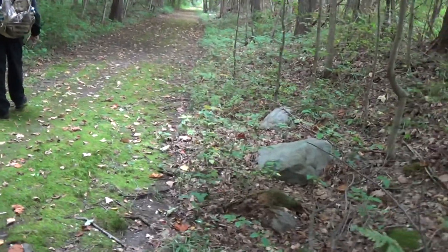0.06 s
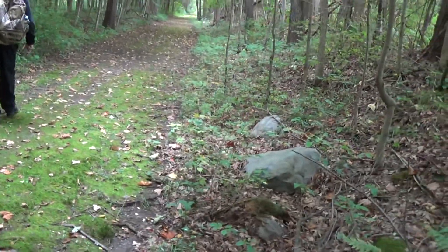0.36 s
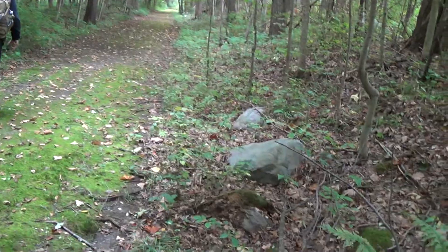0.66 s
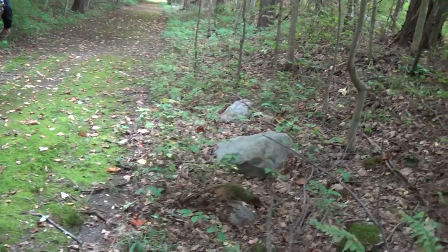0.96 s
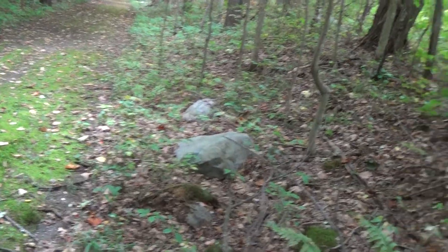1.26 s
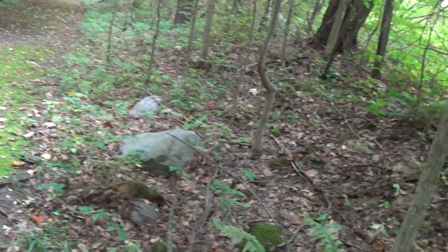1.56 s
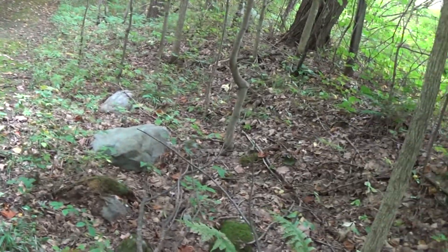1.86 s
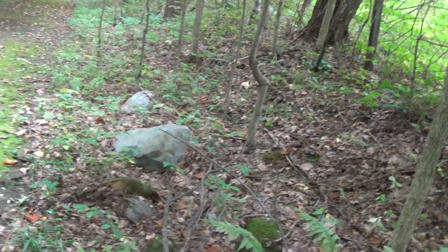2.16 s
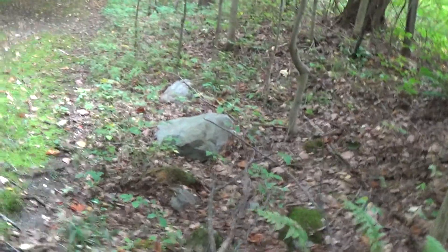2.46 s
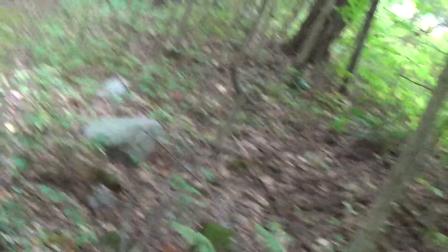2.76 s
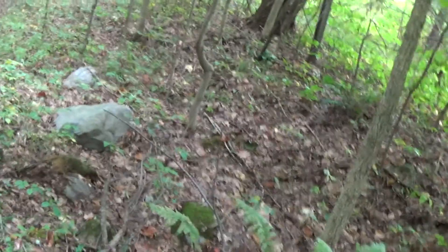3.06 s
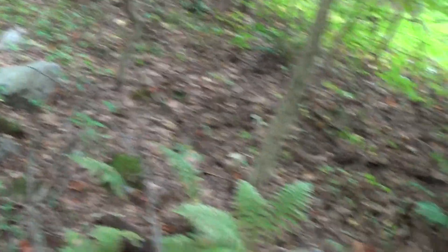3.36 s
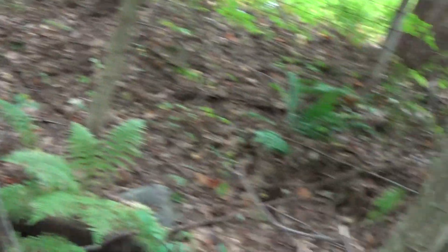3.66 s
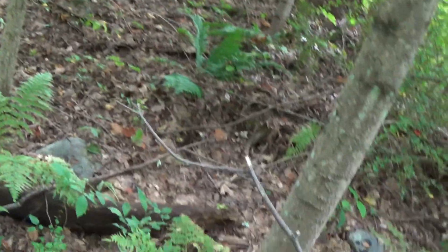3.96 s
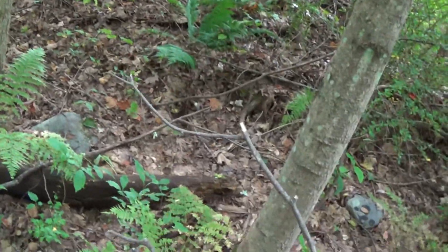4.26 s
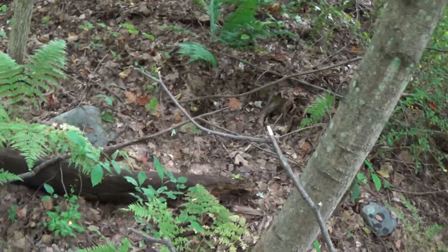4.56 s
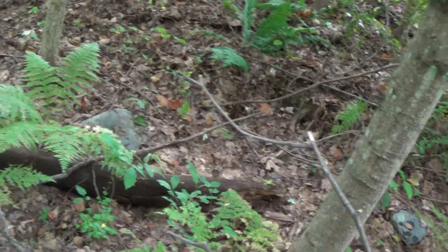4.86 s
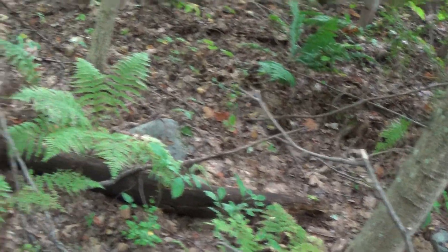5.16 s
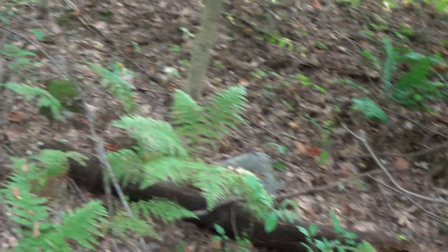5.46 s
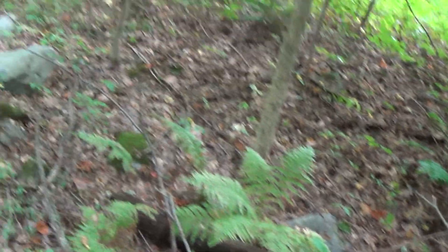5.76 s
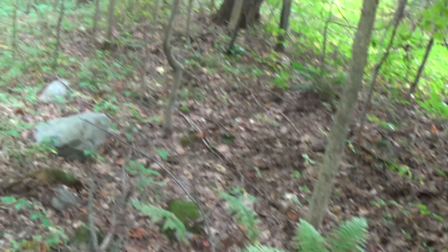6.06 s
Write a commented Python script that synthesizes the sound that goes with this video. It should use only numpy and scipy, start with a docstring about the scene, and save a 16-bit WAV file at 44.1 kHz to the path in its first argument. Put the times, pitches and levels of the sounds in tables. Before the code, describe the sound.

A single loud knock of wood on a tree cracks out slightly right of the microphone and reverberates through the woods for a second or so. Before and after it come only small, close sounds: light crunches of dry leaves, tiny twig snaps and soft handling noise. The background is very still, with faint airy hiss, a thin high whine and a far-off insect trill.

```python
"""In a quiet wood, a stick is struck once, hard, against a tree a little to the right.
The impact excites damped modes of stick and trunk; nearby trunks reflect the crack,
and multiple scattering in the forest draws it out into a long reverberant tail.
Close by, dry leaves rustle, twigs tick and handling makes soft, dull rubs,
over a faint hiss of air, a thin whine and the trill of a distant insect."""
import sys
import numpy as np
from scipy import signal
from scipy.fft import rfft, irfft
from scipy.io import wavfile
from scipy.ndimage import uniform_filter1d

SR = 44100
rng = np.random.default_rng(int(sys.argv[2]) if len(sys.argv) > 2 else 0)


def persist_wave(psi):
    """Save psi, clipped to +-1, as 16-bit WAV."""
    counts = np.round(np.clip(psi, -1, 1) * 32767).astype(np.int16)
    wavfile.write(sys.argv[1], SR, np.atleast_2d(counts).T)


N = 279197
TIME, FREQ = np.arange(N) / SR, np.fft.rfftfreq(N, 1 / SR)
KNOCK_S, FLUTTER_HZ = 2.648, 25.6

# likeness of the knock at the two ears: frequency_hz, correlation
KNOCK_CORRELATION = [(100, 1), (300, 0.97), (640, 0.96), (1400, 0.55), (3000, 0.72), (6000, 0.61),
                     (9000, 1)]
# direction of the knock: frequency_hz, left_minus_right_db
KNOCK_PAN = [(100, 7), (380, -3.5), (700, -5), (1300, -6.5), (2400, -5.5), (4400, -4), (8000, -0.5)]


def amp(db):
    """Amplitude grows tenfold for every 20 dB."""
    return 10 ** (np.asarray(db) / 20)


def unit(x):
    """Normalisation to rms 1."""
    return x / np.sqrt(np.mean(x ** 2) + 1e-20)


def curve(points):
    """Interpolation of (frequency_hz, value) points on a logarithmic frequency axis."""
    hz, value = np.transpose(points)
    return np.interp(np.log(FREQ + 1), np.log(hz + 1), value)


def filtered(x, gain):
    """Linear filtering multiplies the spectrum by a gain."""
    return irfft(rfft(x) * gain, N)


def resonance(hz, width_hz):
    """A Lorentzian resonance curve, width_hz wide at half height."""
    return 1 / (1 + (2 * (FREQ - hz) / width_hz) ** 2)


def sides(pan_db):
    """A level difference between the ears gives direction; positive is left."""
    return amp(np.array([[.5], [-.5]]) * pan_db)


def add(mix, start_s, sound):
    """Superposition: a sound adds to the mix from start_s on."""
    part = mix[:, max(round(start_s * SR), 0):][:, :sound.shape[-1]]
    part += sound[..., :part.shape[1]]


def stereo(drive, gain, correlation, pan_db=0):
    """Sum and difference of two independent signals form a coloured, partly coherent pair of rms 1."""
    correlation = np.clip(correlation, -1, 1)
    mid = rfft(drive[0]) * np.sqrt(1 + correlation)
    side = rfft(drive[1]) * np.sqrt(1 - correlation)
    return unit(irfft(np.array([mid + side, mid - side]) * gain * sides(pan_db), N))


def hiss():
    """Two uncorrelated channels of white noise."""
    return rng.standard_normal((2, N))


def wander(samples):
    """A moving average turns white noise into a slow fluctuation of rms 1."""
    return unit(uniform_filter1d(rng.standard_normal(N), size=samples))


def swell(peak_s, rise, fall):
    """An envelope with a rounded peak and exponential flanks."""
    distance = np.where(TIME < peak_s, (peak_s - TIME) / rise, (TIME - peak_s) / fall)
    return np.exp(1 - np.hypot(1, np.minimum(distance * 1.42, 60)))


def air(level_db=-56.5, drift_db=1.65, whine_hz=15734.5, whine_db=-71):
    """Ambient noise: a drifting broadband hiss, faint narrow bands and a thin pure-tone whine."""
    # spectrum of still air: frequency_hz, relative_db
    spectrum = [(12, -48), (20, -20), (58, -1), (140, -5.5), (170, -8), (376, -7.5), (481, -8), (522, -8),
                (632, -9), (2000, -13), (2420, -12), (3760, -15.5), (5360, -12), (14000, -34.5)]
    # its likeness at the two ears: frequency_hz, correlation
    correlation = [(60, 1), (180, 0.94), (550, 0.46), (1650, 0.19), (4970, 0.49), (15000, 1)]
    # background bands: centre_hz, level_db, width_hz, flutter_depth
    bands = [(137.2, -72, 3.7, 0.05), (2430, -72.5, 230, 0.1), (4490, -72, 350, 0), (14600, -73, 1440, 0.1)]
    drift = unit(sum(np.sin(2 * np.pi * (hz * TIME + rng.random())) for hz in np.geomspace(.2, 3, num=8)))
    out = amp(level_db + drift_db * drift) * stereo(hiss(), amp(curve(spectrum)), curve(correlation))
    flutter = np.sin(2 * np.pi * FLUTTER_HZ * TIME)
    for hz, db, width_hz, depth in bands:
        band = unit(filtered(rng.standard_normal(N), resonance(hz, width_hz)))
        out += amp(db) * (1 + depth * flutter) * band
    return out + amp(whine_db) * np.sqrt(2) * np.sin(2 * np.pi * whine_hz * TIME)


def insect(pitch_hz=5255, level_db=-73, uneven_db=1.5, waver_hz=8):
    """Amplitude modulation: a distant insect pulses a wavering tone into chirps of unequal strength."""
    chirps = np.sin(np.pi * FLUTTER_HZ * TIME) ** 2 * amp(uneven_db * wander(2000))
    tone = np.sin(2 * np.pi * np.cumsum(pitch_hz + waver_hz * wander(2000)) / SR)
    return amp(level_db) * unit(chirps * tone)


def stirring_db(time_s):
    """The slow envelope of the leaf litter's movement, interpolated in decibels."""
    # stirring before and after the knock, a list for each: time_s, relative_db
    stirring = [
        [(0.0, -54.5), (0.32, -52), (0.63, -60), (0.93, -62.5), (1.41, -68.5), (1.96, -64.5), (2.17, -56),
         (2.55, -60), (2.62, -54.5)],
        [(2.95, -60), (3.12, -62), (3.94, -61), (4.06, -48.5), (4.2, -63), (4.75, -65.5), (5.35, -67),
         (6.15, -68), (6.33, -66.5)],
    ]
    return np.interp(time_s, *np.vstack(stirring).T)


def crackle(per_s, spread_db, sliding, clump_db):
    """Shot noise: tiny random snaps, swelling in clumps, over the hiss of sliding friction."""
    snaps = hiss() * (rng.random((2, N)) < per_s / SR)
    snaps *= amp(spread_db * np.minimum(rng.exponential(1, (2, N)), 4))
    return unit(snaps * amp(clump_db * wander(300))) + sliding * hiss()


def leaves(body_hz=1500, settle_ratio=1.68, stir_gain_db=2.5):
    """Countless impulses merge into a rustle as leaves are brushed; a heavier push adds low body."""
    # spectrum of dry leaves: frequency_hz, relative_db
    spectrum = [(59, -43), (100, -5.5), (210, -11.5), (406, -5.5), (513, -9), (608, -6), (1450, -4),
                (1910, -7.5), (9410, -1.5), (12100, -3.5), (16000, -20)]
    # pushes through the leaves: peak_s, level_db, rise_s, body_db, left_minus_right_db
    brushes = [(0.274, -34, 0.0044, -5, 1.5), (.344, -35, .008, -0.5, 0.5), (.364, -32, 0.013, 3.5, 1),
               (1.02, -52.5, 0.024, 11.5, 4), (1.125, -55, 0.016, 6, 7), (3.9, -45, .013, -28, -5.5),
               (3.949, -34.5, .012, -7, -3), (3.994, -42.5, 0.0055, -5, -3.5),
               (4.078, -31.5, .024, -12, -3), (4.19, -49, 0.023, -9, -3.5), (4.5, -61, 0.039, -12, 2),
               (4.855, -55.5, 0.012, -5, 3)]
    crush = crackle(per_s=11000, spread_db=2.4, sliding=.7, clump_db=1.3)
    litter = crackle(per_s=2500, spread_db=2.8, sliding=.9, clump_db=3)
    colour = amp(curve(spectrum))
    rustle = stereo(crush, colour, correlation=1)
    body = filtered(rustle, 1 / (1 + (FREQ / body_hz) ** 2))
    out = amp(stir_gain_db + stirring_db(TIME)) * stereo(litter, colour, correlation=1)
    for peak_s, db, rise, body_db, pan_db in brushes:
        envelope = amp(db) * swell(peak_s, rise, settle_ratio * rise)
        out += envelope * (rustle + (amp(body_db) - 1) * body) * sides(pan_db)
    return out


def small_snaps(count=50, above_stir_db=17, spread_db=3, centre_hz=7500, octaves=.4):
    """A random point process of snaps that follow the stirring in level: start_s, relative_db, centre_hz."""
    snaps = []
    for when, size, pitch in rng.random((count, 3)):
        start_s = when * N / SR
        db = stirring_db(start_s) + above_stir_db + spread_db * min(-np.log(1 - size), 2)
        snaps.append((start_s, db, centre_hz * 2 ** (octaves * (2 * pitch - 1))))
    return snaps


def twigs(gain_db=-5, snap_s=.0011, shiver_db=-22, shiver_s=.0045, pan_db=2.5):
    """A brief impulse has a broad spectrum: each snap is a noise burst, then a faint shiver of leaves."""
    # the clearest snaps of twigs and leaf edges: start_s, relative_db, centre_hz
    snaps = [(.006, -32, 8950), (.074, -30.5, 5200), (.197, -23, 9200), (0.2495, -25, 2400),
             (0.2666, -15, 11000), (.3237, -27.5, 9000), (0.574, -38, 5000), (1.005, -32, 4500),
             (1.114, -34, 5500), (2.188, -37, 9300), (2.306, -38, 6000), (2.456, -44, 8500),
             (2.63, -31, 1500), (2.907, -31.5, 8600), (3.305, -28, 6000), (3.393, -26, 5400),
             (3.888, -33, 7000), (3.956, -28, 4000), (4.03, -23, 10000)]
    size = 4096
    t, hz, out = TIME[:size], np.fft.rfftfreq(size, 1 / SR), np.zeros((2, N))
    lowpass = 1 / np.hypot(1, (hz / 12500) ** 7)
    envelope = np.exp(-t / snap_s) + amp(shiver_db) * np.exp(-t / shiver_s)
    for start_s, db, centre_hz in snaps + small_snaps():
        colour = lowpass / np.hypot(1, np.log2((hz + 1) / centre_hz) ** 2)
        noise = unit(irfft(rfft(rng.standard_normal(size)) * colour))
        add(out, start_s, amp(db + gain_db) * noise * envelope * sides(pan_db))
    return out


def handling():
    """Friction noise through broad resonances gives the dull rubs and bumps of handling."""
    # rubs and bumps: peak_s, level_db, flank_s, centre_hz
    rubs = [(0.093, -56, 0.013, 280), (.15, -62.5, .17, 510), (1.083, -68, 0.68, 597),
            (2.52, -58.5, 0.23, 650), (2.61, -53, 0.031, 89.5), (3.62, -58, .09, 50),
            (4.878, -56, .008, 520), (6.186, -60.5, 0.18, 420)]
    friction = rng.standard_normal(N)
    return sum(amp(db) * swell(peak_s, flank, flank) * unit(filtered(friction, resonance(hz, width_hz=hz)))
               for peak_s, db, flank, hz in rubs)


def wood(gain_db=-2):
    """Modal vibration: stick and trunk ring as damped sinusoids, the lowest building up most slowly."""
    # modes of stick and trunk: pitch_hz, relative_db, t60_s, build_s
    modes = [ (140, -19, .2, .06), (266, -13, .19, .028), (416, -19, .2, .008), (442, -23, .17, .008),
             (694, -18, .19, .001), (818, -17, .26, .006), (1224, -20, .2, .003),
             (657, -11.5, 0.099, 0.0014), (935, -29.5, 0.17, .001), (1003, -17, 0.1, 0.00086),
             (1352, -20, 0.056, .001), (1360, -21.5, 0.186, 0.0012), (1920, -23, 0.257, 0.0011),
             (2264, -24.5, 0.23, .001), (2290, -39.5, .2, .002), (2377, -16.5, 0.121, 0.0018),
             (2560, -21, .22, .002), (2560, -22.5, 0.32, 0.0017), (2930, -34.5, .15, 0.002044),
             (3460, -23, 0.17, .003), (4710, -27, 0.34, 0.00294), (5140, -28, 0.23, 0.0034)]
    t, out = TIME[:SR], np.zeros((2, N))
    for hz, db, t60, build in modes:
        phase = rng.uniform(0, 2 * np.pi)
        # a phase difference between the ears sets their correlation
        correlation = np.interp(hz, *np.transpose(KNOCK_CORRELATION))
        offset = rng.choice([-.5, .5]) * np.arccos(correlation)
        ring = np.sin(2 * np.pi * hz * t + phase + np.array([[offset], [-offset]]))
        envelope = amp(gain_db + db - 60 * t / t60) * (1 - np.exp(-t / build))
        add(out, KNOCK_S, ring * envelope * sides(np.interp(hz, *np.transpose(KNOCK_PAN))))
    return out


def crack(gain_db=-2, direct_q=3, smeared_q=39, smear_s=.022, highpass_hz=330):
    """Multipath propagation: the crack arrives directly, then off single trunks, drawn out by the path."""
    # direct and reflected paths: delay_s, relative_db, centre_hz, left_minus_right_db
    paths = [(0, -10.5, 1143, -5), (.003, -5.5, 2316, -9), (.0098, -9.5, 2500, -7.5),
             (0.0204, -21, 1434, -2), (.0345, -11.5, 2370, -9), (.04, -13.5, 2470, 7),
             (.054, -18.5, 694, -9), (.08, -15.5, 2480, 0), (0.392, -35, 1380, 5)]
    t, out = TIME[:SR // 4], np.zeros((2, N))
    for delay, db, hz, pan_db in paths:
        q = smeared_q + (direct_q - smeared_q) * np.exp(-(delay / smear_s) ** 2)
        age = 2 * np.pi * hz / q * t  # in time constants
        burst = age * np.exp(1 - age) * np.sin(2 * np.pi * (hz * t + rng.random()))
        add(out, KNOCK_S + delay, amp(gain_db + db) * burst * sides(pan_db))
    return signal.sosfilt(signal.butter(2, highpass_hz, "highpass", fs=SR, output="sos"), out)


def forest(near_db=-17, far_db=-22, far_build_s=.0304, linger_t60_s=2.27, clump_db=2):
    """Multiple scattering: a dense cluster of echoes from near growth, then a tail from farther trunks."""
    # scatter from the undergrowth: frequency_hz, relative_db
    near_spectrum = [(35, -58.5), (60, -27), (127, -12.5), (198, -10.5), (256, -6.5), (338, -12.5),
                     (492, -3.5), (682, -5.5), (903, -8.5), (1470, -2.5), (1620, -9), (2410, -2.5),
                     (2770, -4.5), (11000, -25), (16000, -44.5)]
    # scatter from the far forest: frequency_hz, relative_db
    far_spectrum = [(35, -53), (60, -18), (136, -18), (301, -13.5), (515, -18), (682, -6.5), (822, -12.5),
                    (1040, -7), (1200, -10), (1410, -5.5), (1910, -9), (2410, -7), (4220, -14),
                    (4860, -9.5), (16000, -61.5)]
    # its direction: frequency_hz, left_minus_right_db
    far_pan = [(60, 2), (240, 3), (950, 4), (3770, 1), (15000, 10)]
    # reverberation by band: centre_hz, near_build_s, near_hold_s, near_t60_s, far_t60_s, linger_db
    bands = [(150.3, 0.0095, 0.054, 0.1, 0.61, -26), (368, .005, 0.053, 0.2, 0.37, -15.5),
             (780, 0.0014, .07, 0.056, 0.88, -10.5), (1400, 0.0013, 0.073, 0.14, 0.82, -12),
             (2580, 0.00072, 0.029, 0.42, 0.89, -16.5), (5100, 0.013, 0.016, 0.35, 0.55, -27),
             (10000, 0.00393, 0.035, 0.3, 0.56, -25)]
    t, correlation = np.maximum(TIME - KNOCK_S, 0), curve(KNOCK_CORRELATION)
    stems = np.sqrt(.15 + .85 * FREQ ** 4 / (FREQ ** 4 + 800 ** 4))  # thin stems scatter little bass
    near = amp(near_db) * stereo(hiss(), amp(curve(near_spectrum)), correlation, curve(KNOCK_PAN))
    far = amp(far_db) * stereo(hiss(), amp(curve(far_spectrum)), correlation, curve(far_pan))
    centres, out = [row[0] for row in bands], np.zeros((2, N))
    for hz, build, hold, near_t60, far_t60, linger_db in bands:
        band = curve([(centre, float(centre == hz)) for centre in centres])  # triangular passband
        cluster = (1 - np.exp(-t / build)) * amp(-60 * np.maximum(t - hold, 0) / near_t60)
        double_decay = np.hypot(amp(-60 * t / far_t60), amp(linger_db - 60 * t / linger_t60_s))
        tail = (1 - np.exp(-t / far_build_s)) * double_decay
        clumps = amp(clump_db * wander(600))  # trees stand in groups
        out += filtered(near, stems * band) * cluster + filtered(far, band) * tail * clumps
    return out


def after_ring(build_s=.064, correlation=.47, pan_db=3):
    """Reverberation blurs the wood's strongest modes into narrow, slowly fading bands of noise."""
    # modes lingering in the far echoes: centre_hz, width_hz, level_db, t60_s
    bands = [(695, 44, -48, 1.54), (1040, 70, -36.5, 1.13), (1415, 67.5, -36.5, 1.56),
             (2370, 133, -41, 1.3), (2400, 160, -21, 0.5), (3500, 260, -32.5, 0.84), (5080, 204, -37.5, .5)]
    t = np.maximum(TIME - KNOCK_S, 0)
    ring = sum(amp(db - 60 * t / t60) * stereo(hiss(), resonance(hz, width_hz), correlation, pan_db)
               for hz, width_hz, db, t60 in bands)
    return (1 - np.exp(-t / build_s)) * ring


def scene():
    """Superposition of the knock, its echoes and the small sounds of the wood."""
    knock = wood() + crack() + forest() + after_ring()
    return knock + leaves() + twigs() + air() + insect() + handling()


def record(dry, cutoff_hz=16000):
    """Soft saturation rounds the loudest peaks; a low-pass filter then limits the band."""
    rounded = dry / (1 + dry ** 6) ** (1 / 6)
    lowpass = signal.firwin(511, cutoff_hz, window=("kaiser", 9), fs=SR)
    return signal.oaconvolve(rounded, lowpass[None], "same")


dry = scene()
out = record(dry)
persist_wave(out)
```